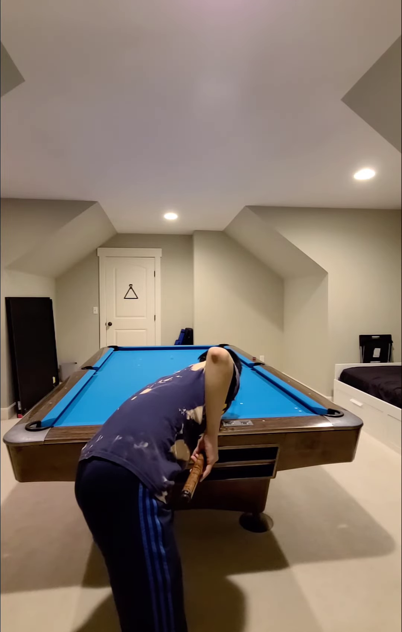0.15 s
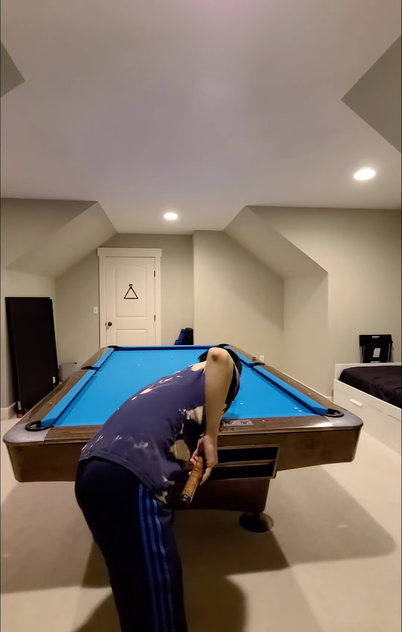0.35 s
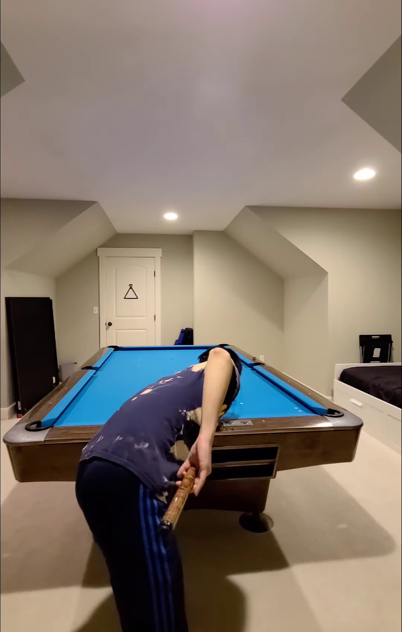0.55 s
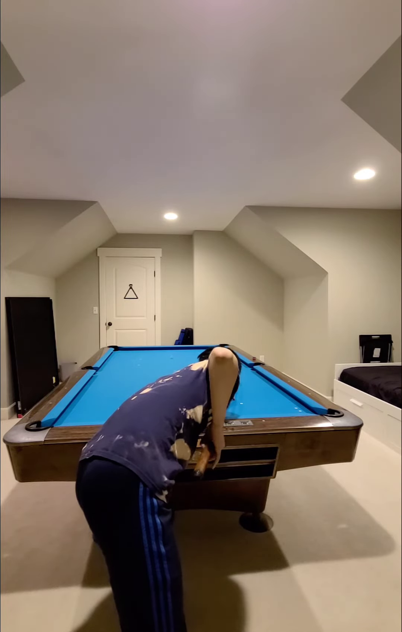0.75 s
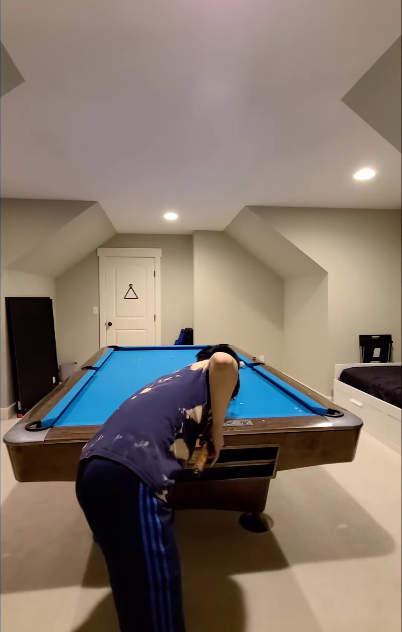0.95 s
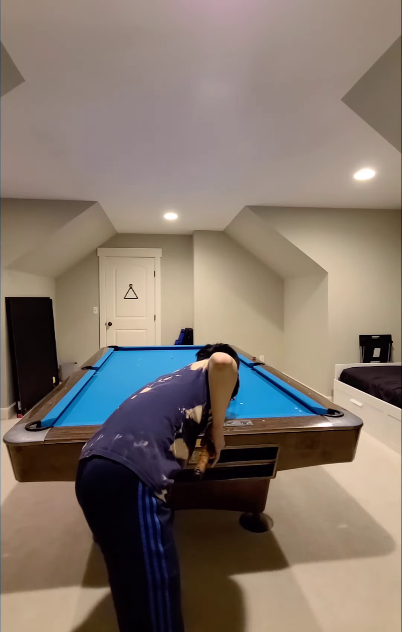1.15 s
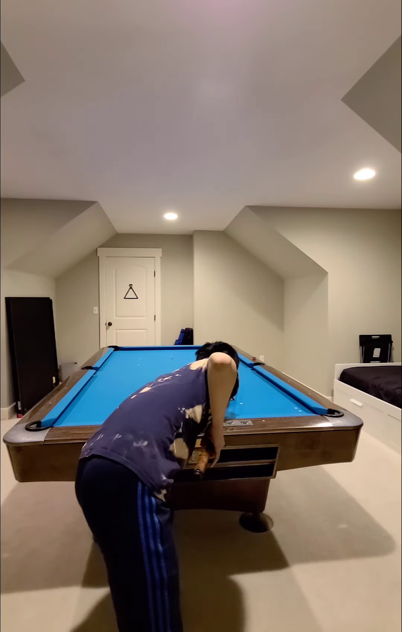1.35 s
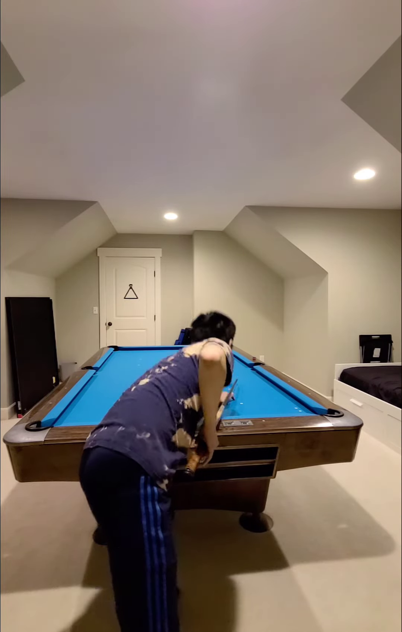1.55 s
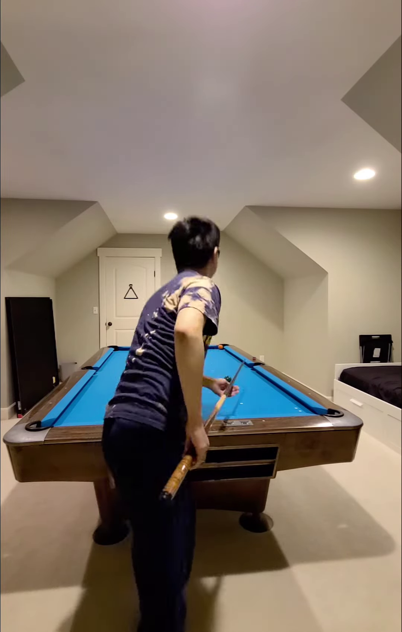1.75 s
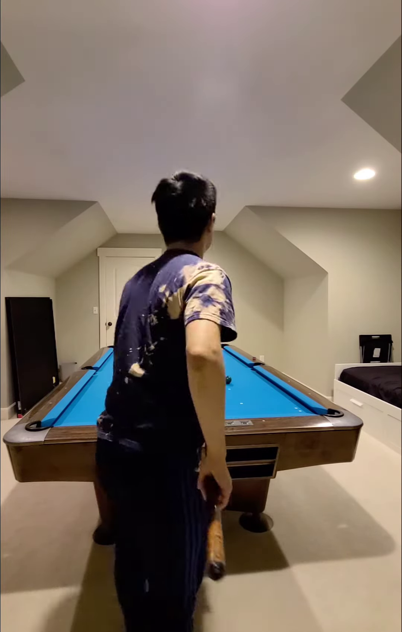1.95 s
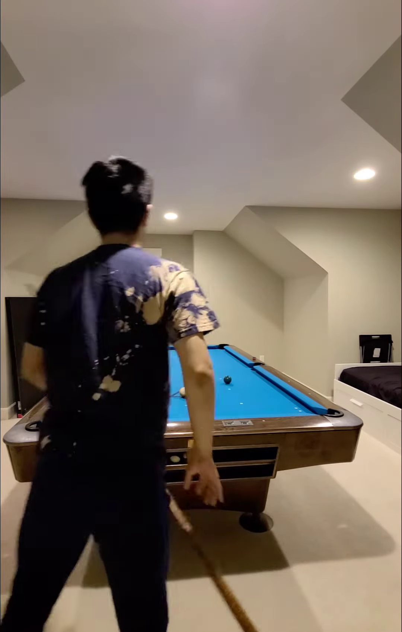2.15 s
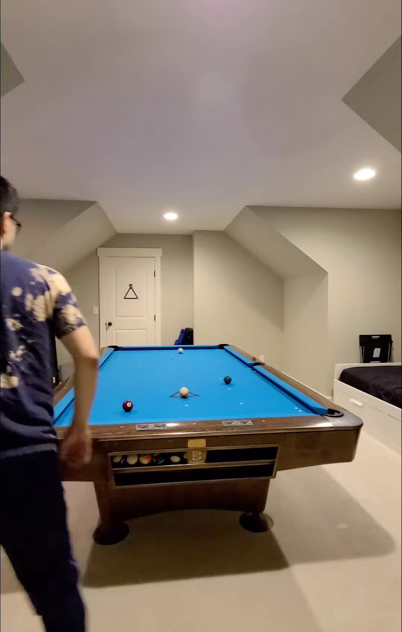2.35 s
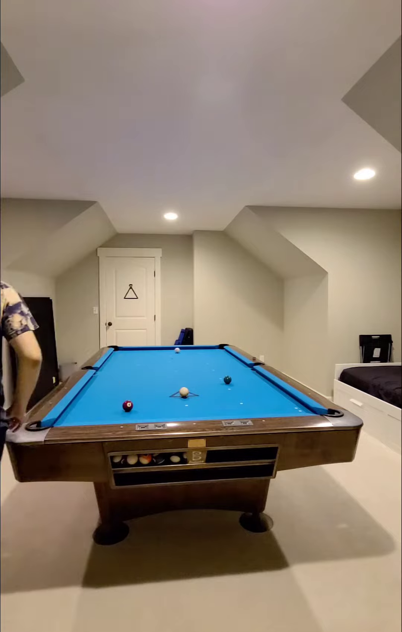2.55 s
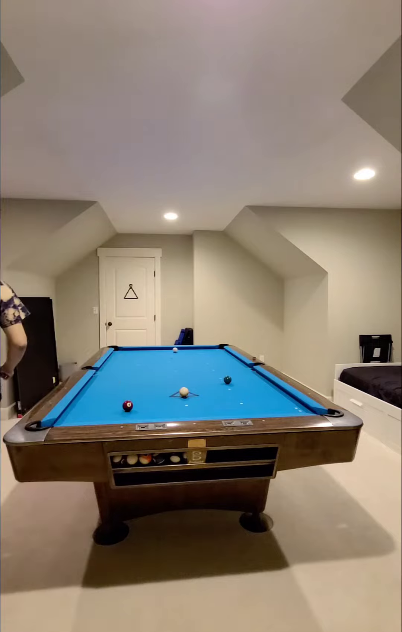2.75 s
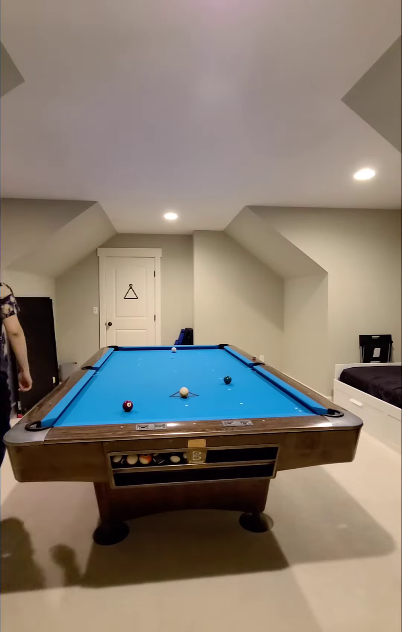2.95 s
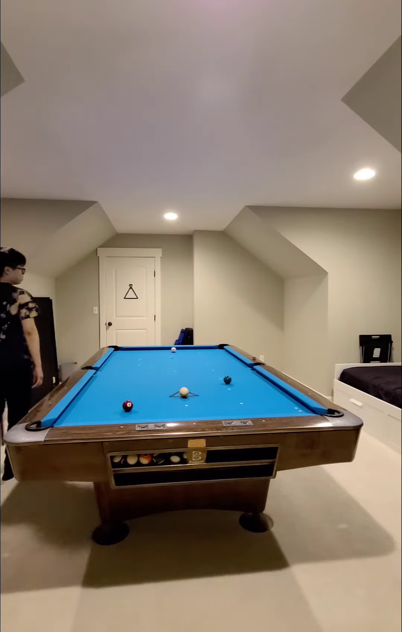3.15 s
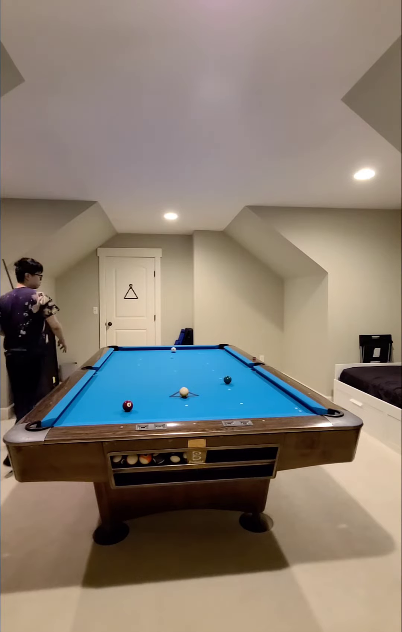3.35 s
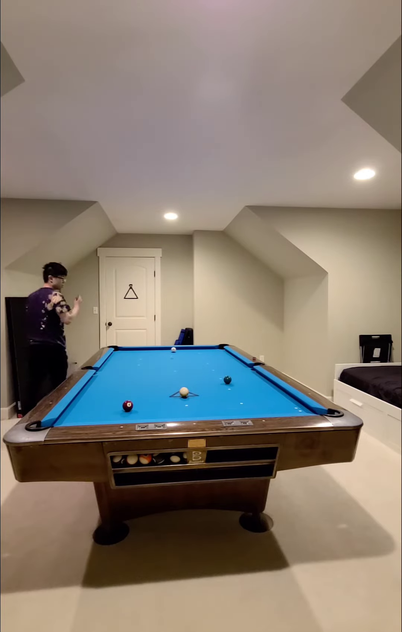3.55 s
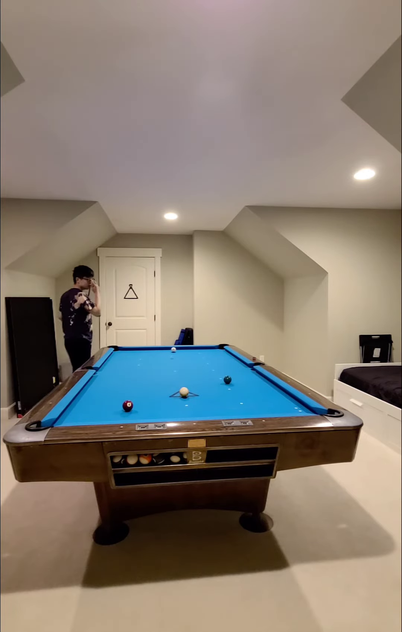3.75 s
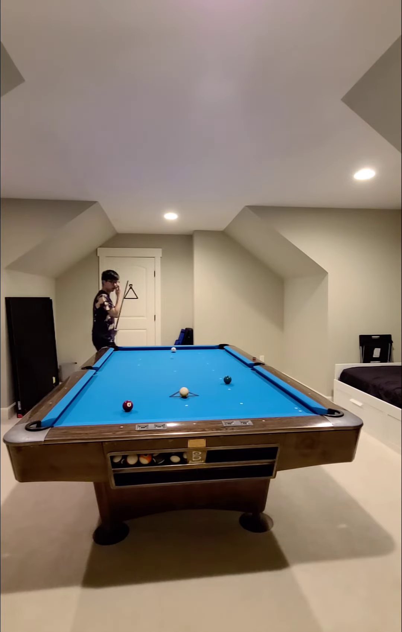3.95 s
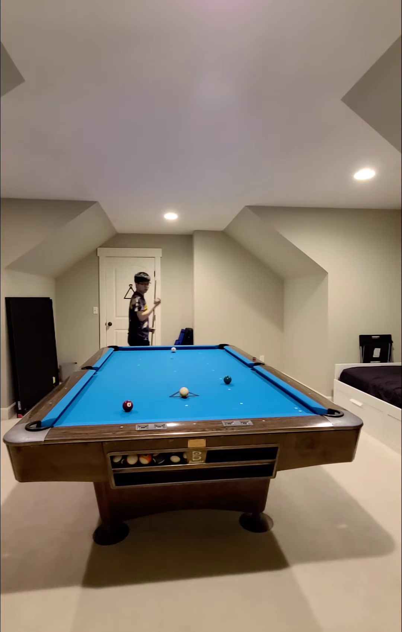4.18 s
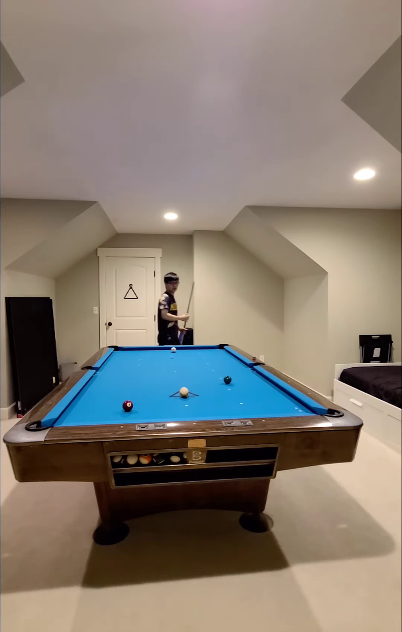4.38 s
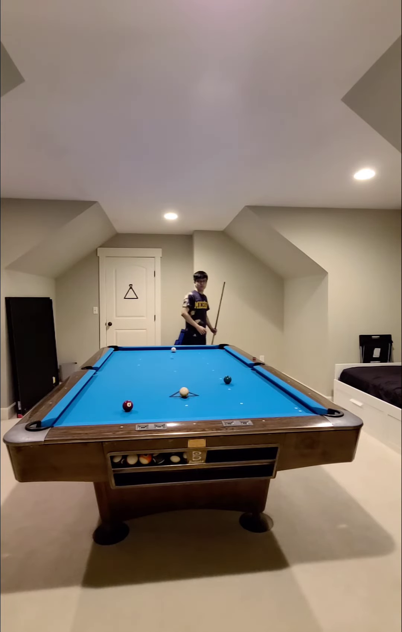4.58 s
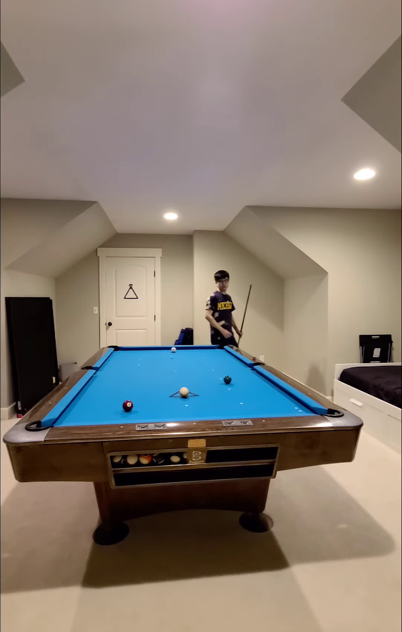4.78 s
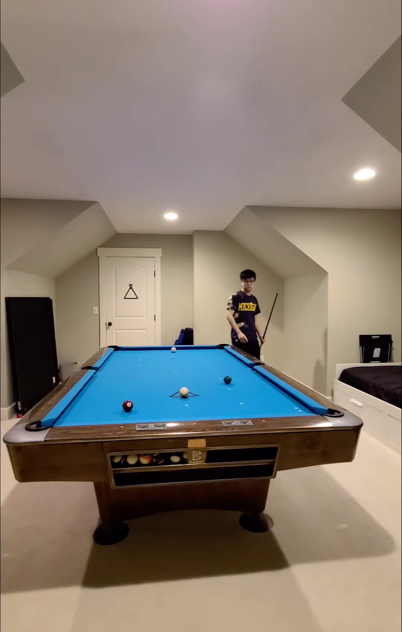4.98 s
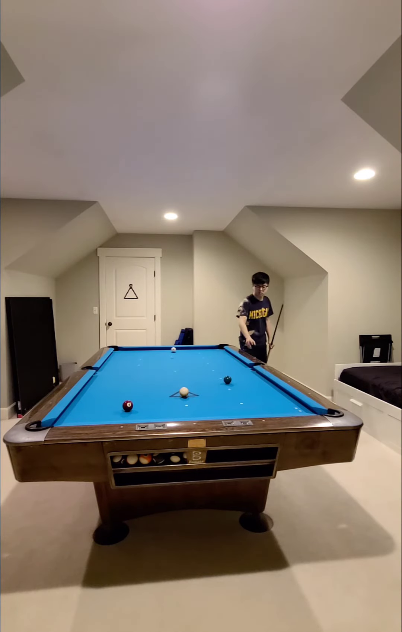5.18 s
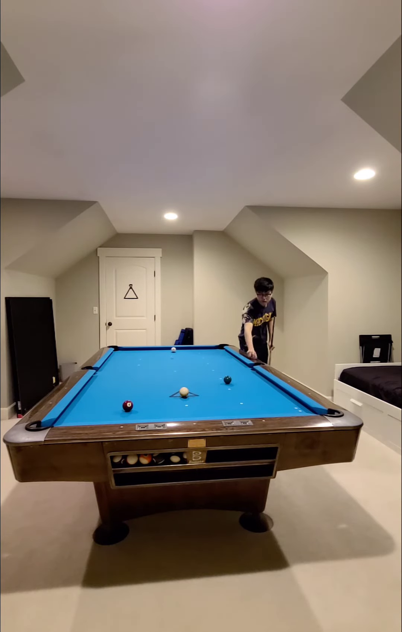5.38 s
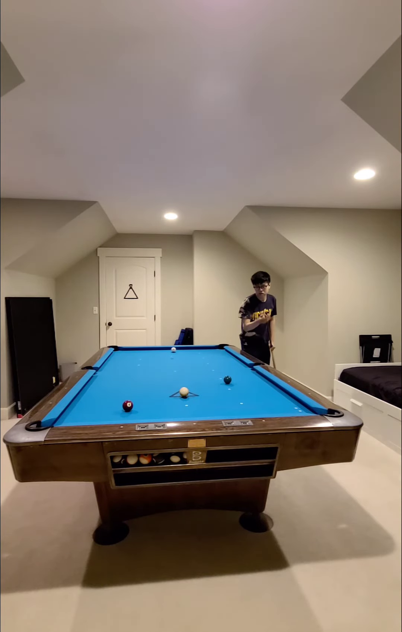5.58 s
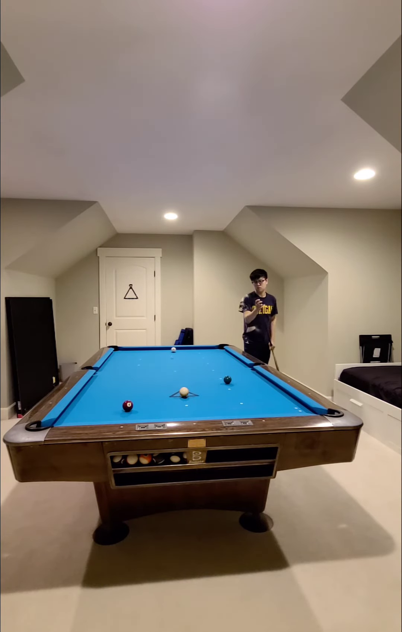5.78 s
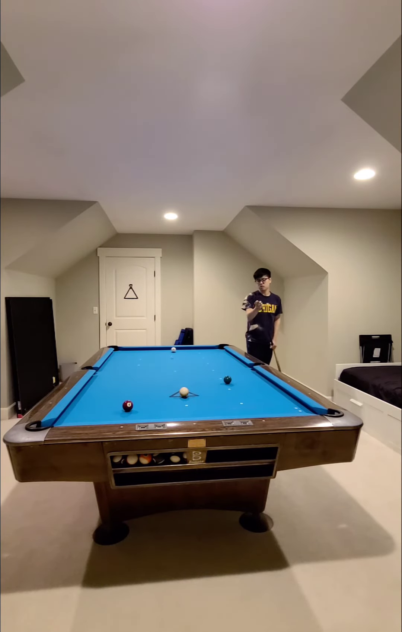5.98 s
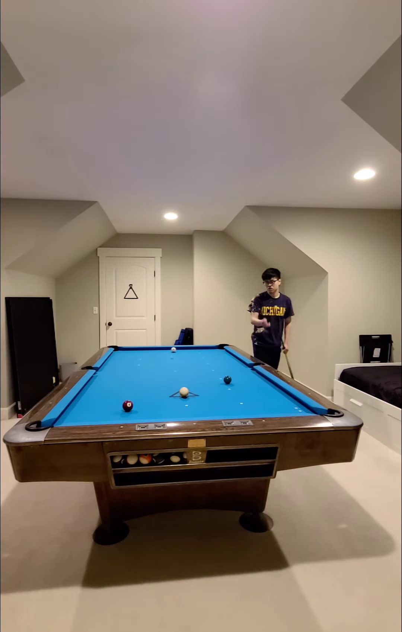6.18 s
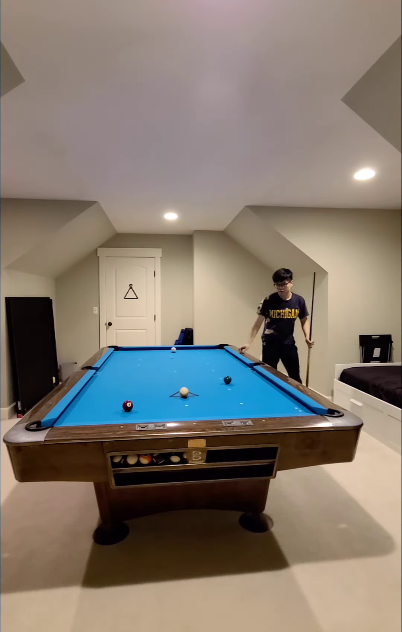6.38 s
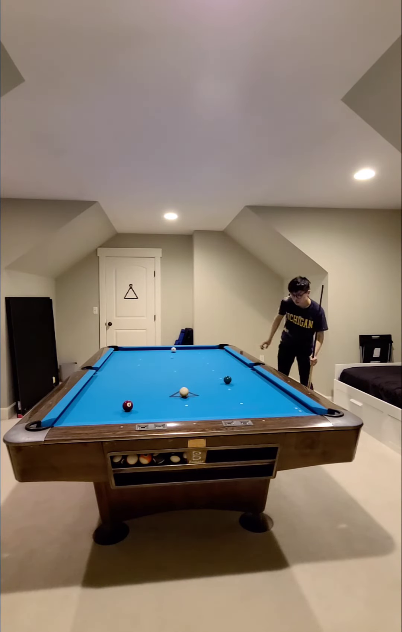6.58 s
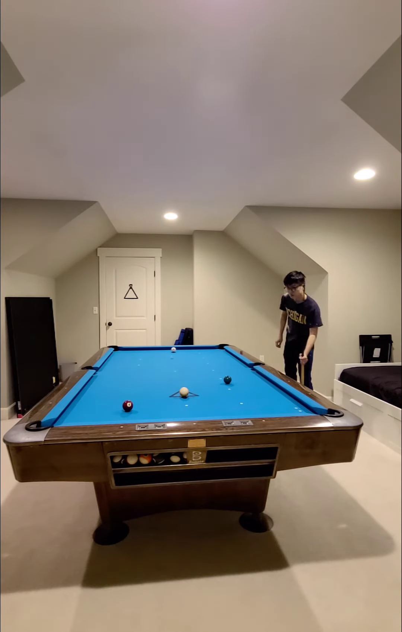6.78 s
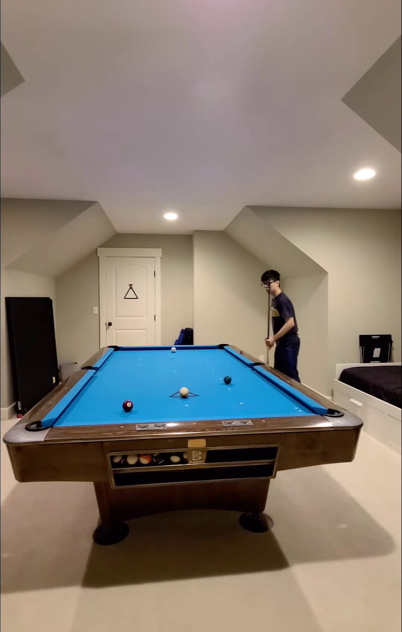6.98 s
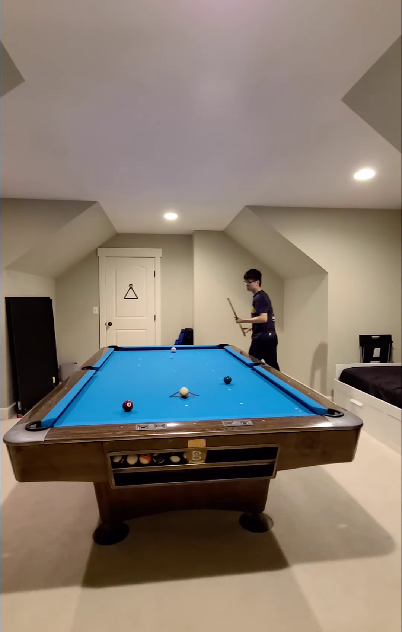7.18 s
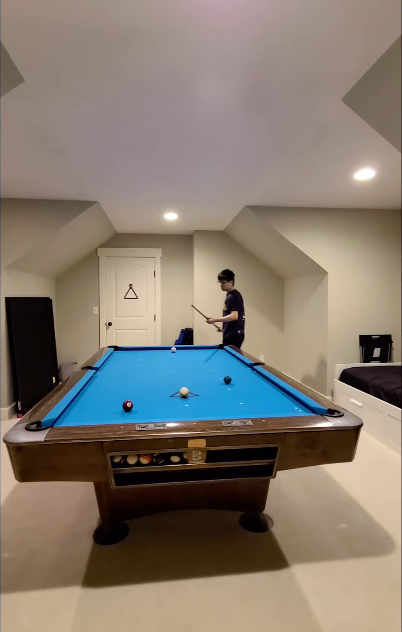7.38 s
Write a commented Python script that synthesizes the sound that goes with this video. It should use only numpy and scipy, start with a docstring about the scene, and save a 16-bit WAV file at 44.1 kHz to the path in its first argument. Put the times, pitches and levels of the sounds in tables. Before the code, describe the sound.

In a quiet carpeted room a pool cue cracks the cue ball, balls clack, one slams into a pocket, then soft footsteps and chalk rubbing.

```python
"""A shot on a pool table in a small carpeted room, heard from behind the player, over low rumble and faint hiss.
The cue strikes and its shaft rings; the cue ball hops, rolls and clacks into another ball.
A second faint hiss fades in and stays; balls thud on the cushions and one slams into a pocket.
The player walks round while balls knock in the return, shuffles, chalks the tip and sets the cube on the rail.
Blows are short noise bursts, coloured like the struck body, plus ringing sines and a room answer."""
import sys
import numpy as np
from scipy import signal
from scipy.fft import rfft, irfft, next_fast_len
from scipy.io import wavfile

SR = 44100
rng = np.random.default_rng(int(sys.argv[2]) if len(sys.argv) > 2 else 0)


def dump_mix(stems):
    """Bounce the given channels to the path in sys.argv[1] as a 16-bit WAV at rate SR."""
    frames = np.atleast_2d(stems).T  # one column per channel
    limited = np.clip(frames, -1, 1)  # hard clip at full scale
    pcm = np.round(limited * 32767).astype(np.int16)
    wavfile.write(sys.argv[1], SR, pcm)


N = 327442
TIME = np.arange(N) / SR
# one blow: samples before its peak, and its time axis in seconds
LEAD = 2646
BLOW_T = (np.arange(18000) - LEAD) / SR

# The tip meets the cue ball. Each row: peak time in seconds, relative level in dB, brightness in dB per octave.
CUE_HITS = [(0.946, -17.5, 0.5)]
# Footfalls. Each row: time in seconds, relative level of the scuff in dB.
FOOTSTEPS = [(2.81, -54), (3.09, -52), (3.379, -55.5), (3.60, -50), (3.854, -58.5), (4.114, -58),
             (4.366, -49.5), (4.655, -63), (4.90, -59), (5.26, -56.5), (5.42, -50), (5.61, -61.5)]
# Ringing of the floor joists. Each row: base frequency in Hz, relative level in dB, time to fall 60 dB in seconds.
JOIST_RINGS = [(44, 0, .3), (66, -2, 0.37), (126.4, -5, 0.271), (198.5, -13, 0.178)]
# Spectrum of the low rumble. Each row: frequency in Hz, relative density in dB per Hz.
RUMBLE_SPECTRUM = [(20, -14.5), (43, -9.5), (72, -2), (90, -6.5), (124, -15), (160, -17.5), (215, -26.5),
                   (280, -20), (360, -33.5), (600, -45.5), (1300, -74)]
# Spectrum of the scuffs and of the later hiss. Each row: frequency in Hz, relative density in dB per Hz.
SCUFF_SPECTRUM = [(300, 9.5), (900, 6.5), (2800, 1.5), (5500, -3.5), (8500, -43.5), (15000, -28.5)]
FLOOR_HZ = 30.88  # the floor's own low note


def amp(db):
    """Turn decibels into a gain."""
    return 10 ** (np.asarray(db) / 20)


def at_hz(points, hz):
    """Read a table between its points, on a log-frequency axis."""
    f, value = np.transpose(points)
    return np.interp(np.log(hz), np.log(f), value)


def bins(size):
    """Frequencies of a spectrum in Hz, kept above zero."""
    return np.maximum(np.fft.rfftfreq(size, 1 / SR), 1)


def shaped(x, response):
    """Filter by a frequency response, given as a function of Hz."""
    size = next_fast_len(x.shape[1], True)
    spectrum = rfft(x, size) * response(bins(size))
    return irfft(spectrum, size)[:, :x.shape[1]]


def add(out, s, sound):
    """Mix in a blow whose peak falls at s seconds."""
    start = round(s * SR) - LEAD
    out[:, start:start + sound.shape[1]] += sound[:, :N - start]


def coloured(x, colour, tilt_db=0):
    """Give two white signals a spectrum at equal power; left and right are more alike in the lows."""
    # Each row: frequency in Hz, likeness of left and right (1 is identical).
    likeness = [(70, 0.19), (250, 0.34), (600, 0.22), (1400, 0.092), (12000, 0.0094)]

    def response(hz):
        tilt = tilt_db * np.log2(np.maximum(hz, 400))  # dB per octave, above 400 Hz only
        gain = amp(at_hz(colour, hz) + tilt)
        gain = gain / np.sqrt(1 + (colour[0][0] / hz) ** 8)  # fades below the first table point
        alike = np.clip(at_hz(likeness, hz), -1, 1)
        mid_and_side = np.array([1 + alike, 1 - alike])
        return gain * np.sqrt(mid_and_side / 2 / np.mean(gain ** 2))

    mid, side = shaped(x, response)
    return np.array([mid + side, mid - side])


def grains(size, grain_db):
    """Stereo noise made of tiny clicks of uneven size, at rms 1."""
    uneven = amp(grain_db * rng.standard_normal((2, size)))
    x = rng.standard_normal((2, size)) * uneven
    return x / x.std()


def envelope(swell_s, t60):
    """A quick swell to the peak, then a free decay that falls 60 dB in t60 seconds."""
    swell = np.exp(np.minimum(BLOW_T, 0) / swell_s)
    return swell * amp(-60 * np.maximum(BLOW_T, 0) / t60)


def room_tail(swell_s, delay_s=.006):
    """Dense reflections follow just after a blow; the highest treble dies first."""
    # Each row: frequency in Hz, time to fall 60 dB in seconds.
    room_decay = [(100, 0.5), (300, 0.2283), (800, 0.2056), (2200, 0.1561), (5000, 0.193), (12000, 0.01)]
    size, tail = len(BLOW_T), 0
    white = rfft(grains(size, grain_db=4.5))
    centres = [hz for hz, _ in room_decay]
    for (_, t60), own in zip(room_decay, np.eye(len(centres))):
        share = np.interp(np.log(bins(size)), np.log(centres), own)  # overlapping bands
        tail = tail + irfft(white * share, size) * envelope(swell_s, t60)
    return np.pad(tail, ((0, 0), (int(delay_s * SR), 0)))[:, :size]


def early_echoes(x, echo_db=-7.5, latest_s=.014, count=5):
    """Cloth, ceiling and walls return a few echoes to each side, combing the mids and treble."""
    high_pass = signal.butter(1, 300, "high", fs=SR, output="sos")
    bounced = amp(echo_db) * signal.sosfilt(high_pass, x)
    out = x.copy()
    for side, delays in enumerate(rng.uniform(.0015, latest_s, (2, count))):
        for lag in np.ceil(delays * SR).astype(int):
            out[side, lag:] += bounced[side, :-lag]
    return out / np.sqrt(1 + count * amp(2 * echo_db))


def blows(rows, colour, swell_s, body_t60, room_db):
    """Each contact rings a body's dense, short-lived resonances, and the room answers."""
    out = np.zeros((2, N))
    for s, level_db, tilt_db in rows:
        crack = grains(len(BLOW_T), grain_db=1.5) * envelope(swell_s, body_t60)
        answered = crack + amp(room_db) * room_tail(swell_s)
        add(out, s, amp(level_db) * coloured(answered, colour, tilt_db))
    return out


def ring(modes, swell_s, ratio=1, spread_hz=500):
    """Damped sines of a struck body; the higher the mode, the less the two sides agree in phase."""
    out = 0
    for hz, db, t60 in modes:
        side_phase = min(hz / spread_hz, 2) * rng.standard_normal((2, 1))
        phase = 2 * np.pi * rng.random() + side_phase
        sine = np.cos(2 * np.pi * hz * ratio * BLOW_T + phase)
        out = out + amp(db) * sine * envelope(swell_s, t60)
    return out


def ringing(rows, modes, swell_s, uneven_db=5.5, detune=0.0, spread_hz=500):
    """Every blow rings the same modes with strengths of its own, a dull blow mostly the low ones."""
    out = np.zeros((2, N))
    middle_hz = np.median([hz for hz, _, _ in modes])
    for s, level_db, tilt_db in rows:
        struck = []
        for hz, db, t60 in modes:
            tilt = tilt_db * np.log2(hz / middle_hz)
            struck.append((hz, db + tilt + uneven_db * rng.standard_normal(), t60))
        ratio = 1 + detune * rng.standard_normal()
        add(out, s, amp(level_db) * ring(struck, swell_s, ratio=ratio, spread_hz=spread_hz))
    return out


def booms(rows, ratio, spread_hz=170):
    """Slate and cabinet boom under a ball's weight; the pitch ratio depends on where it lands."""
    # Each row: base frequency in Hz, relative level in dB, time to fall 60 dB in seconds.
    table_rings = [(63.7, -9.5, 0.34), (76.8, -4, .24), (111.33, 4, .2), (135.1, -5, .24),
                   (148.4, -15, 0.13), (210.9, -18, 0.29)]
    out = np.zeros((2, N))
    for s, level_db in rows:
        boom = ring(table_rings, swell_s=0.0032, ratio=ratio, spread_hz=spread_hz)
        add(out, s, amp(level_db) * boom)
    return out


def thuds(rows):
    """Soft thuds of balls on cloth and rubber, each at another spot."""
    # Each row: frequency in Hz, relative density in dB per Hz.
    soft_spectrum = [(110, -4.5), (150, -1), (250, -5), (350, -5), (420, -8.5), (580, -12), (720, -25.5),
                     (900, -30), (1400, -43), (3000, -72), (12000, -100)]
    # Brief ringing. Each row: base frequency in Hz, relative level in dB, time to fall 60 dB in seconds.
    soft_rings = [(250.6, -1.5, 0.27), (336, -1.5, .14), (480, -8, 0.13), (602, -4.5, 0.0526),
                  (656.4, -8.5, 0.12), (811.56, -16, 0.088), (1120, -30, .08), (1407.6, -31, 0.07)]
    soft = blows(rows, soft_spectrum, swell_s=0.00585, body_t60=0.067, room_db=-8) * amp(-4.5)
    rung = ringing(rows, soft_rings, swell_s=0.0062, uneven_db=3.0, detune=.04) * amp(-10)
    return soft + rung


def background():
    """Low rumble of the room under a faint hiss, both steady filtered noise."""
    # Each row: frequency in Hz, relative density in dB per Hz.
    hiss_spectrum = [(150, 4.5), (400, 6), (700, 3), (1250, 4), (1800, -4), (4200, -5.5), (5200, 0),
                     (6900, 0), (8200, -18), (10000, -15.5), (12000, -11.5), (15500, -13)]
    rumble = coloured(rng.standard_normal((2, N)), RUMBLE_SPECTRUM) * amp(-58.5)
    hiss = coloured(rng.standard_normal((2, N)), hiss_spectrum, tilt_db=1.4) * amp(-75.5)
    return rumble + hiss


def later_hiss():
    """A faint steady hiss of grainy noise fades in at 1.7 s and stays."""
    hiss_from_s, hiss_rise_s, hiss_db = 1.7, .6, -71
    risen = np.clip((TIME - hiss_from_s) / hiss_rise_s, 0, 1)
    hiss = coloured(grains(N, grain_db=3.0), SCUFF_SPECTRUM, tilt_db=-0.5)
    return amp(hiss_db) * risen * hiss


def scuffs():
    """Socks scuff at each step, and clothes and cue brush the player now and then: soft noise bursts."""
    # Clothes and cue brush the player. Each row: time in seconds, relative level in dB.
    brushes = [(1.28, -63), (2.51, -53), (4.482, -53.5), (5.026, -55), (5.11, -53)]
    scuff_lead_s = 0.008  # the scuff comes just before the weight
    rows = [(s - scuff_lead_s, db, 0) for s, db in FOOTSTEPS] + [(s, db, 0) for s, db in brushes]
    strokes = blows(rows, SCUFF_SPECTRUM, swell_s=0.0099, body_t60=.1, room_db=-8.5)
    return early_echoes(strokes) * amp(-5.5)


def footfalls(floor_t60=0.4186, joists_db=-32, joist_share=0.405):
    """Each step flexes the floor and thumps its joists; the walk swells, eases off and ends in a shuffle."""
    heaviest_s, heaviest_db, ease_db_per_s, lightest_db = 4.368, -26.5, 10.5, -41.5
    shuffle_from_s, shuffle_gap_s, shuffle_db, shuffle_count = 5.9, 0.33, -49.5, 4
    steps = []
    for s, _ in FOOTSTEPS:
        steps.append((s, max(heaviest_db - ease_db_per_s * abs(s - heaviest_s), lightest_db)))
    for k in range(shuffle_count):
        steps.append((shuffle_from_s + shuffle_gap_s * k, shuffle_db))
    out = np.zeros((2, N))
    for s, level_db in steps:
        floor_ratio = 1 + .1 * rng.standard_normal()
        flex = ring([(FLOOR_HZ, level_db, floor_t60)], swell_s=0.01855, ratio=floor_ratio, spread_hz=50)
        joist_ratio = 1 + 0.0996 * rng.standard_normal()
        joists = ring(JOIST_RINGS, swell_s=0.0116, ratio=joist_ratio, spread_hz=130)
        # the joists follow only a share of the step's weight in dB
        add(out, s, flex + amp(joists_db + joist_share * level_db) * joists)
    return out


def ticks():
    """Small hard ticks: very short, bright bursts."""
    # Each row: peak time in seconds, relative level in dB.
    tick_times = [(0.951, -42), (0.9615, -54), (2.5162, -66), (6.6406, -59.5)]
    # Each row: frequency in Hz, relative density in dB per Hz.
    tick_spectrum = [(2000, -17), (4500, 7), (6500, 7.5), (8800, -9.5), (11000, 0.5), (15500, -11.5)]
    rows = [(s, db, 0) for s, db in tick_times]
    return blows(rows, tick_spectrum, swell_s=0.00133, body_t60=0.0205, room_db=-20.0) * amp(5)


def chalk():
    """Gritty strokes across the tip, duller on the way back; then the cube rattles down on the wooden rail."""
    # Each row: middle in seconds, relative level in dB, seconds by which a duller back stroke leads.
    rubs = [(5.967, -65, 0.0161), (6.058, -45.5, 0.0193), (6.196, -46.5, .044), (6.345, -45.5, 0.0512)]
    # The cube lands and rocks. Each row: time in seconds, relative level in dB, brightness in dB per octave.
    landings = [(6.578, -28, -0.3), (6.584, -26, -0.76), (6.617, -37, -14.5), (6.722, -52, 4.5)]
    # Spectra of chalk and rail. Each row: frequency in Hz, relative density in dB per Hz.
    chalk_spectrum = [(500, -10.5), (900, -8.5), (1200, 0.5), (1700, 0), (2200, 5), (2600, -3), (3050, 2),
                      (4000, -5), (5600, -3), (7800, -17.5), (10500, -14.5), (15500, -26.5)]
    rail_spectrum = [(150, -18), (210, 5), (310, -11.5), (450, 1.5), (550, -16), (740, 0), (1300, -2),
                     (1950, -5.5), (2500, -6), (3300, -5), (3800, -15.5), (5600, -21.5), (8500, -57),
                     (15000, -43.5)]
    # Each row: frequency in Hz, relative level in dB, time to fall 60 dB in seconds.
    rail_rings = [(208.8, -10, 0.18), (433, -1, 0.271), (729.8, 7, 0.108), (960, -14, 0.071),
                  (1383, 13.5, 0.049), (1616.4, 3.5, 0.1), (1922, 12.5, 0.0736), (2139, 5, 0.114),
                  (2840, -1, .08), (3340, -4, 0.087)]
    half_width_s, forth_tilt_db, back_tilt_db = 0.01224, 1.3, -5.5
    back_db, back_loss_db_per_s = -1, 213  # the slower the back stroke, the softer
    strokes = []
    for s, db, lead_s in rubs:
        strokes.append((s, db, forth_tilt_db))
        strokes.append((s - lead_s, db + back_db - back_loss_db_per_s * lead_s, back_tilt_db))
    rubbing = np.zeros((2, N))
    for s, level_db, tilt_db in strokes:
        pressure = amp(level_db) / np.cosh(np.clip(BLOW_T / half_width_s, -20, 20))
        grit = grains(len(BLOW_T), grain_db=6.5) * pressure
        add(rubbing, s, coloured(grit, chalk_spectrum, tilt_db))
    rattle = early_echoes(blows(landings, rail_spectrum, swell_s=0.00171, body_t60=0.0475, room_db=-9.5))
    rail = ringing(landings[:1], rail_rings, swell_s=0.0014, uneven_db=2.0) * amp(-13)
    return early_echoes(rubbing, echo_db=-6.0, latest_s=.008) + rattle + rail


def ball_return():
    """Hollow knocks at different places along the channel under the bed."""
    # Each row: peak time in seconds, relative level in dB, brightness in dB per octave.
    knock_rows = [(3.906, -39.5, -1), (4.079, -44, -2), (4.350, -51, 2), (4.663, -39, -3),
                  (5.249, -45.5, 2), (5.399, -38, 1), (5.426, -43.5, 0.5), (5.602, -42, -5)]
    # Each row: frequency in Hz, relative density in dB per Hz.
    channel_spectrum = [(76, -17), (130, -9), (191, -9.5), (255, -5), (447, -12), (516, -21), (577, -9),
                        (711, -15.5), (949, -17.5), (1270, -17.5), (6000, -45.5), (7800, -61),
                        (13200, -120)]
    # Each row: base frequency in Hz, relative level in dB, time to fall 60 dB in seconds.
    channel_rings = [(176.76, -2, 0.134), (223.2, -3, 0.0576), (571, -9, 0.049), (725.2, 0.5, 0.1),
                     (769.8, -11, 0.071), (1014, -14, 0.0483), (1267, -33, 0.049), (1841, -9.5, 0.042)]
    knocks = blows(knock_rows, channel_spectrum, swell_s=0.00485, body_t60=0.0342, room_db=-2.5)
    rung = ringing(knock_rows, channel_rings, swell_s=0.00481, uneven_db=2.5, detune=0.0327, spread_hz=1020)
    boom = booms([row[:2] for row in knock_rows], ratio=1.9)
    return early_echoes(knocks) * amp(-3.5) + rung * amp(-7.0) + boom * amp(-11.5)


def rolling():
    """Balls rumble over the slate, which hums at its own pitch; the sound builds, then fades as they slow."""
    # Balls set rolling. Each row: start in seconds, relative level in dB.
    rolls = [(1.0, -42.5), (2.2, -48)]
    build_s, fade_db_per_s = .2, 32
    bed_hz, bed_width_hz = 72.33, 7.9
    level = 0
    for s, db in rolls:
        age = np.maximum(TIME - s, 0)
        fade_db = fade_db_per_s * np.maximum(age - build_s, 0)
        level = level + np.minimum(age / build_s, 1) * amp(db - fade_db)
    rumble = coloured(rng.standard_normal((2, N)), RUMBLE_SPECTRUM)
    hum = shaped(rumble, lambda hz: 1 / (1 + ((hz - bed_hz) / bed_width_hz) ** 2))
    return level * (amp(-6.5) * rumble + amp(-3) * hum / hum.std())


def cushions(contact_tilt_db=3.0, rail_lag_s=.016, rail_db=-1):
    """A ball presses into cloth or rubber; a moment later the rail thuds and the table booms."""
    # Each row: contact in seconds, level in dB, rail thud's brightness in dB per octave, table boom in dB
    # (levels are relative).
    touches = [(1.224, -59.5, -0.5, -52), (1.912, -39.5, 2.5, -38), (2.030, -32, -4, -35),
               (5.194, -37.5, 3.5, -54.5)]
    contacts = [(s, db, contact_tilt_db) for s, db, _, _ in touches]
    rails = [(s + rail_lag_s, db + rail_db, tilt_db) for s, db, tilt_db, _ in touches]
    boom_rows = [(s + rail_lag_s, boom_db) for s, _, _, boom_db in touches]
    return thuds(contacts + rails) + booms(boom_rows, ratio=1.28) * amp(0.73)


def pocket(boom_lag_s=0.0014, floor_db=-30):
    """A ball slams into the pocket, then rattles down its wooden throat; the first two blows shake the floor."""
    # Each row: peak time in seconds, relative level in dB, brightness in dB per octave,
    # relative level of the table boom in dB, pitch ratio of the boom.
    pocket_rows = [(2.237, -11.5, -2, -14.5, 1), (2.331, -19.5, -2, -25.5, .65),
                   (2.342, -29, -3.5, -20.5, 1.13), (2.382, -26.5, -5.5, -26.5, 1.2),
                   (2.411, -32, -6.5, -29, 1.1)]
    # Each row: frequency in Hz, relative density in dB per Hz.
    pocket_spectrum = [(90, -9), (200, -1.5), (300, -8), (400, -5.5), (470, 1), (580, -2), (750, -7.5),
                       (1200, -3), (2000, -2.5), (2700, -2.5), (4000, -14.5), (5500, -26), (8000, -43.5),
                       (15000, -54)]
    # Each row: base frequency in Hz, relative level in dB, time to fall 60 dB in seconds.
    pocket_rings = [(346.2, -10.5, 0.17), (433, -4, 0.17), (494.3, 1, 0.061), (1018, -11.5, 0.1),
                    (1238, -3, 0.093), (1224, -4, .12), (1414, -6, 0.18), (1699.4, -10, 0.11),
                    (1869, -4, .13), (2465, -10, .11), (2862, -8, .13)]
    hits = [row[:3] for row in pocket_rows]
    slam = blows(hits, pocket_spectrum, swell_s=0.0056, body_t60=0.011, room_db=-9)
    slam = early_echoes(slam, echo_db=-10.5) * amp(-3.5)
    # the first two contacts are hard
    crack = blows(hits[:2], pocket_spectrum, swell_s=0.00088, body_t60=0.025, room_db=-21.5) * amp(-1.5)
    rung = ringing(hits, pocket_rings, swell_s=0.0029, uneven_db=2.0, detune=0.01, spread_hz=840)
    out = slam + crack + rung * amp(-13.0)
    for s, _, _, boom_db, ratio in pocket_rows:
        out += booms([(s + boom_lag_s, boom_db)], ratio)
    floor_rings = [(FLOOR_HZ, -2, .4)] + JOIST_RINGS[:2]
    for s, _, _ in hits[:2]:
        add(out, s, amp(floor_db) * ring(floor_rings, swell_s=0.0068, spread_hz=120))
    return out


def clack(slap_count=3, boom_db=-42, boom_lag_s=.022):
    """The cue ball hits another ball hard; the walls slap back in a quick run and the bed booms faintly."""
    # Ball on ball. Each row: peak time in seconds, relative level in dB, brightness in dB per octave.
    ball_hits = [(1.434, -20, 0.5), (1.440, -10, 1)]
    # Each row: frequency in Hz, relative density in dB per Hz.
    clack_spectrum = [(120, -50), (200, -12.5), (231, -27), (320, -45), (451, -26.5), (671, -21.5),
                      (1170, -4), (1690, -3), (2060, 2.5), (3600, -10), (4810, -30), (5760, -64),
                      (6420, -45.5), (8260, -59.5), (15000, -59.5)]
    # Each row: frequency in Hz, relative level in dB, time to fall 60 dB in seconds.
    clack_rings = [(1334, -4.5, 0.11), (1556, -1.5, 0.088), (1838, -6, 0.232), (2108, -2.5, .18),
                   (2165.5, -0.5, .16), (2353, -11.5, 0.2), (2693.6, -9, 0.188), (2945, -11, .16),
                   (3039, -10, 0.1682), (3930, -15, .14)]
    first_s, gap_s, slap_db, loss_db = 0.0095, 0.0068, -20, 0.21  # each slap a little weaker
    s = ball_hits[-1][0]
    slaps = [(s + first_s + gap_s * k, slap_db - loss_db * k, 0) for k in range(slap_count)]
    hits = blows(ball_hits + slaps, clack_spectrum, swell_s=0.004, body_t60=0.01, room_db=-7)
    hits = early_echoes(hits, echo_db=-13.5) * amp(-2.4)
    tail = blows(ball_hits[-1:], clack_spectrum, swell_s=.004, body_t60=.21, room_db=-20.5) * amp(-12.5)
    rung = ringing(ball_hits[-1:], clack_rings, swell_s=0.0028, uneven_db=1.0) * amp(-17)
    return hits + tail + rung + booms([(s + boom_lag_s, boom_db)], ratio=.85, spread_hz=160)


def cue_ball(count=3):
    """Driven into the bed, the cue ball shakes the table and skips on the cloth, weaker each time."""
    gap_s, hop_db, loss_db, tilt_db = 0.021, -31.5, 5.5, 6
    stroke_s = CUE_HITS[0][0]
    hops = [(stroke_s + gap_s * (k + 1), hop_db - loss_db * k, tilt_db) for k in range(count)]
    return thuds(hops) + booms([hops[0][:2]], ratio=.72) * amp(0.5)


def cue():
    """The tip knocks the cue ball and the shaft rings."""
    # Each row: frequency in Hz, relative density in dB per Hz.
    cue_spectrum = [(70, -9), (140, -12), (300, 1), (450, -1.5), (800, 1.5), (1500, -4), (2400, -7.5),
                    (3300, -15.5), (4500, -25.5), (6500, -33), (8500, -47.5), (15000, -58.5)]
    # Each row: frequency in Hz, relative level in dB, time to fall 60 dB in seconds.
    shaft_rings = [(210.6, -25.5, 0.141), (271.2, -16.5, 0.22), (625, -20.5, 0.16), (832.5, -21.5, 0.17),
                   (1134.7, -18.5, 0.16), (1347, -14.5, 0.119), (1658, -25.5, .11), (1880, -12, 0.079),
                   (2252, -0.5, 0.072), (2168, -21.5, 0.18), (2461, -21.5, 0.0715), (3110, -26, 0.0935),
                   (3583, -27, 0.081), (5770, -36.5, 0.101)]
    knock = blows(CUE_HITS, cue_spectrum, swell_s=0.00551, body_t60=0.038, room_db=-8)
    shaft = ringing(CUE_HITS, shaft_rings, swell_s=0.00425, uneven_db=1.0, spread_hz=2900)
    return early_echoes(knock) * amp(-7.0) + shaft * amp(0.5)


def scene():
    """All sources together, somewhat stronger on the right."""
    # Each row: frequency in Hz, left minus right in dB.
    balance = [(60, -1.1), (150, -1.5), (300, -2.5), (1000, -2.5), (2500, -4.5), (5000, -5), (12000, -3)]
    noise_floor = background() + later_hiss()
    player = scuffs() + footfalls() + ticks() + chalk()
    balls = ball_return() + rolling() + cushions() + pocket() + clack() + cue_ball()
    mix = noise_floor + player + balls + cue()
    halves = np.array([[.5], [-.5]])  # half the difference up on one side, down on the other
    return shaped(mix, lambda hz: amp(at_hz(balance, hz) * halves))


def record(dry):
    """Cut the top steeply above 15.7 kHz."""
    low_pass = signal.ellip(10, .05, 60, 15700, fs=SR, output="sos")
    return signal.sosfiltfilt(low_pass, dry)


dry = scene()
out = record(dry)
dump_mix(out)
```